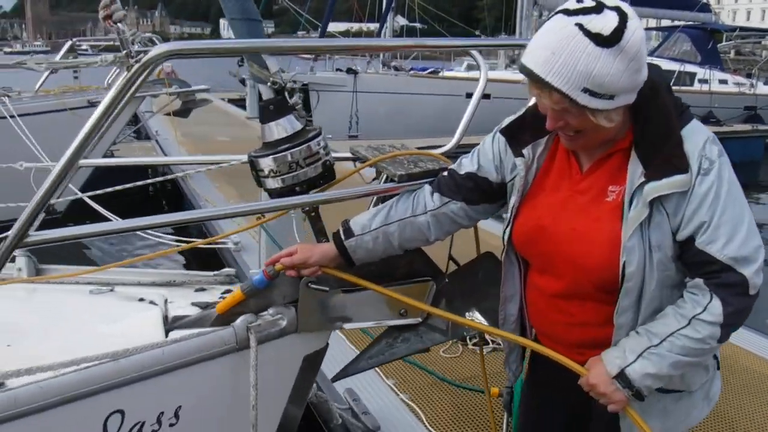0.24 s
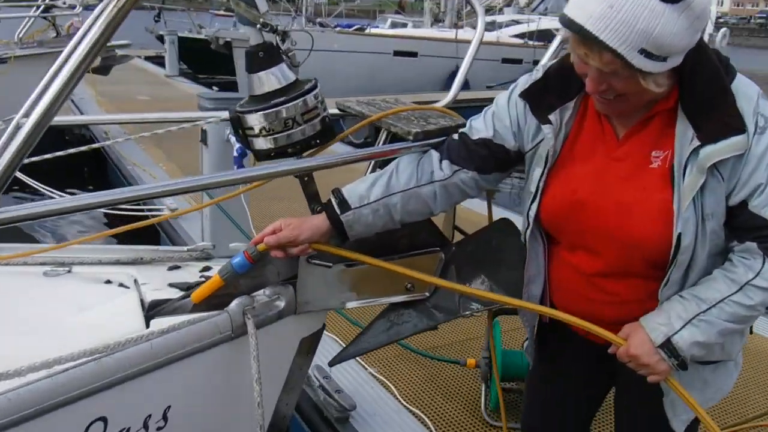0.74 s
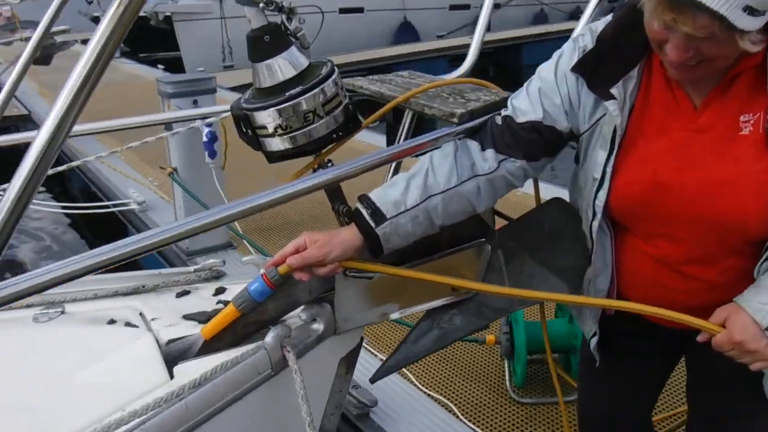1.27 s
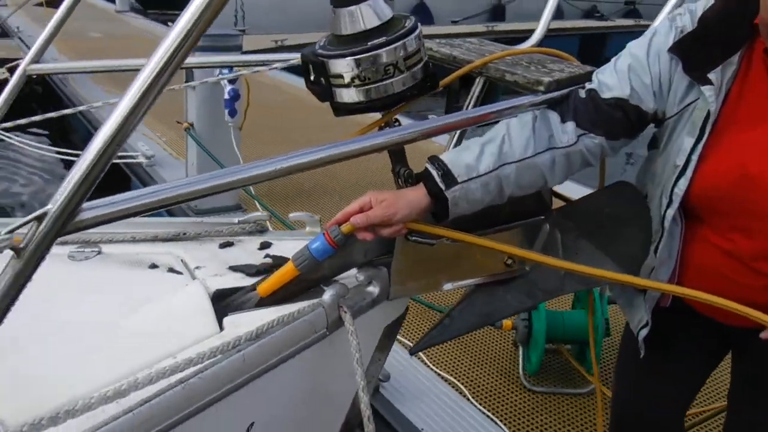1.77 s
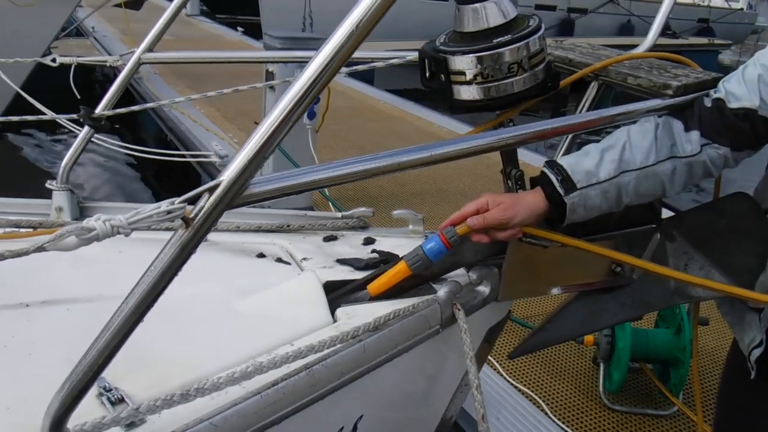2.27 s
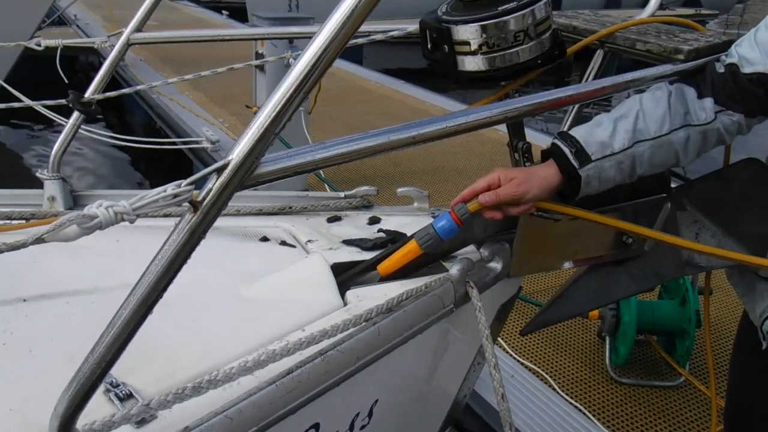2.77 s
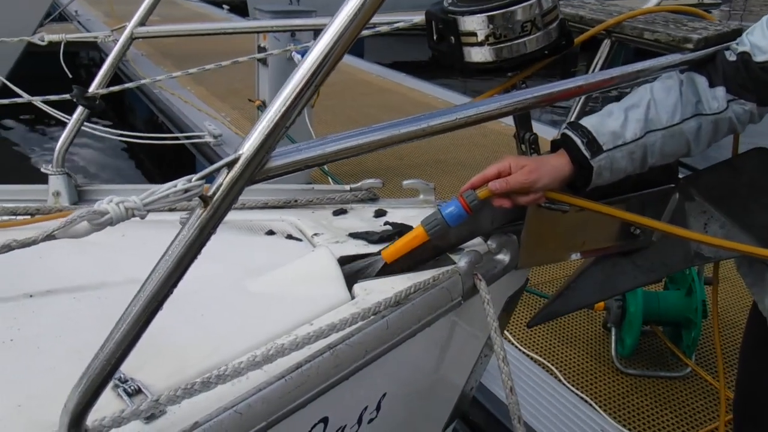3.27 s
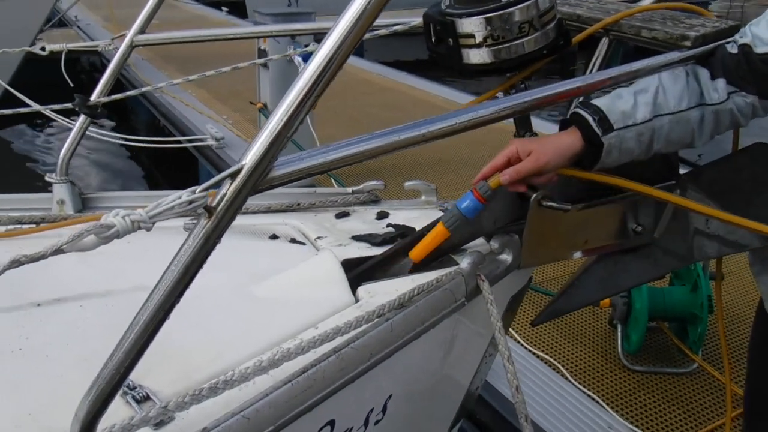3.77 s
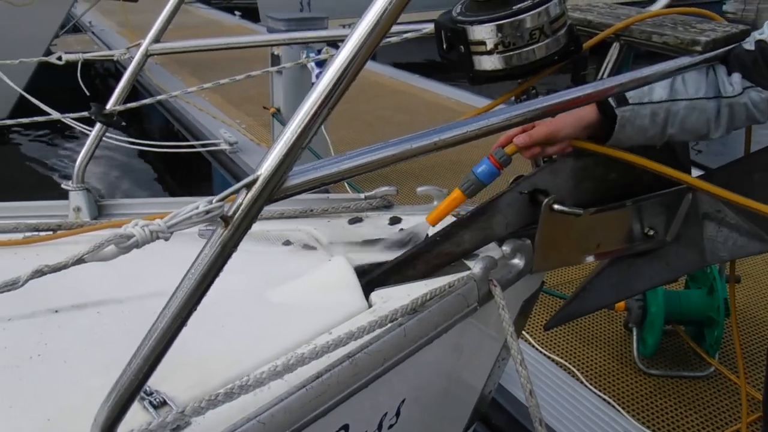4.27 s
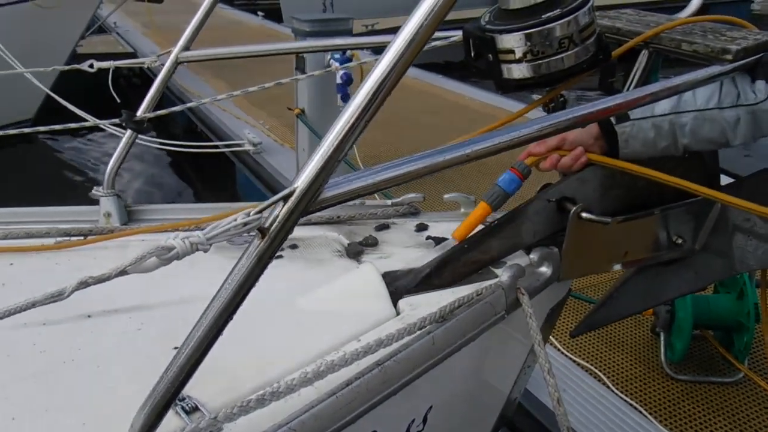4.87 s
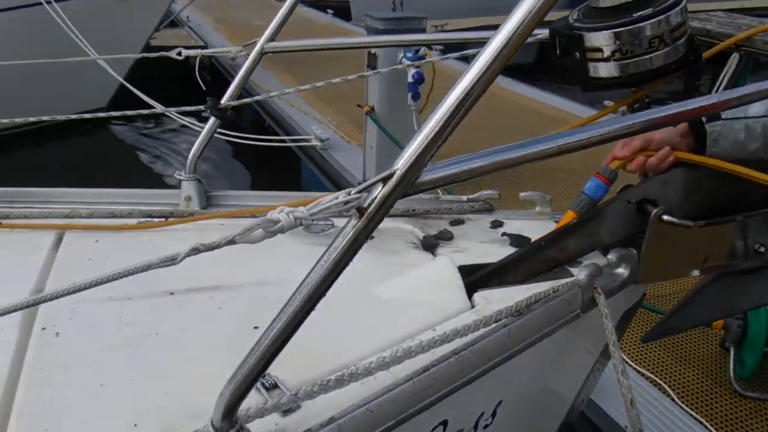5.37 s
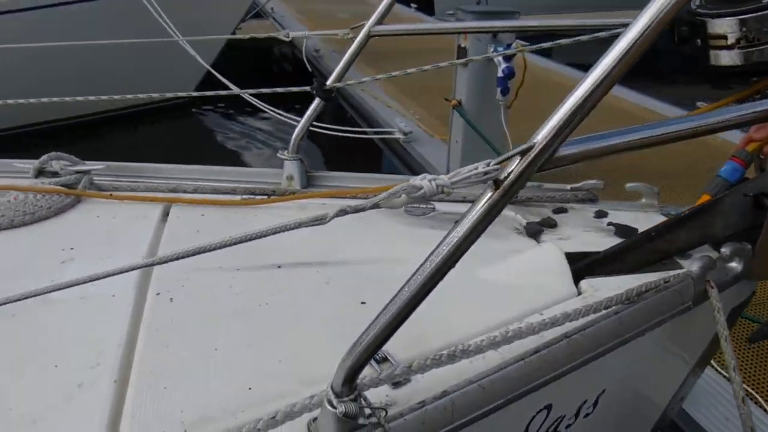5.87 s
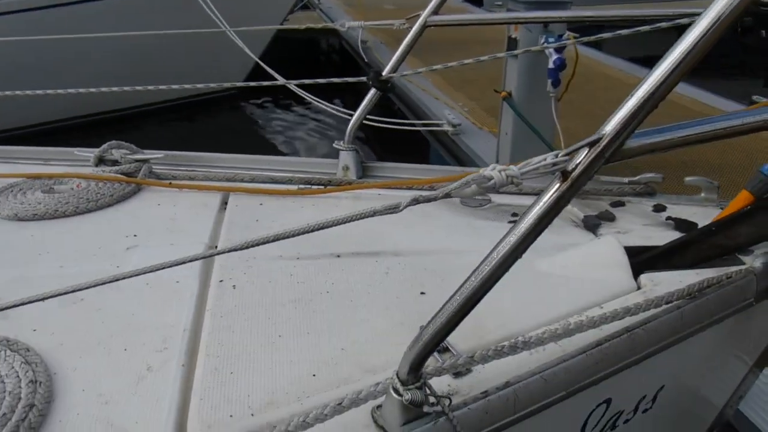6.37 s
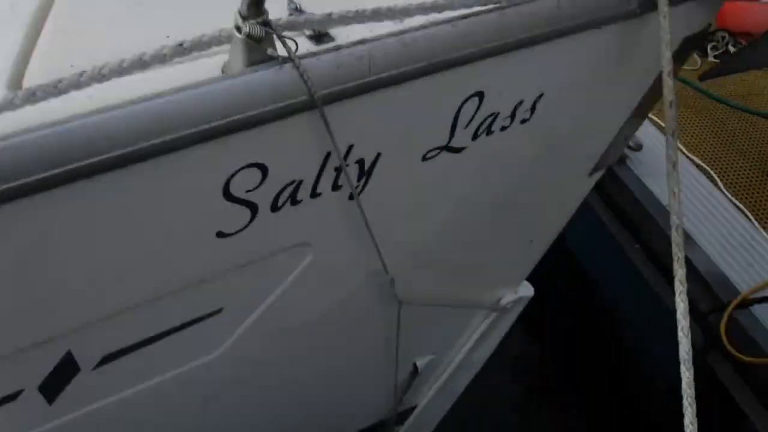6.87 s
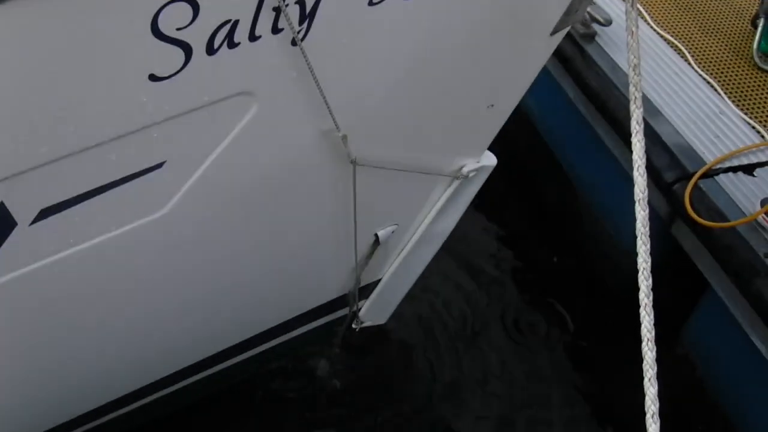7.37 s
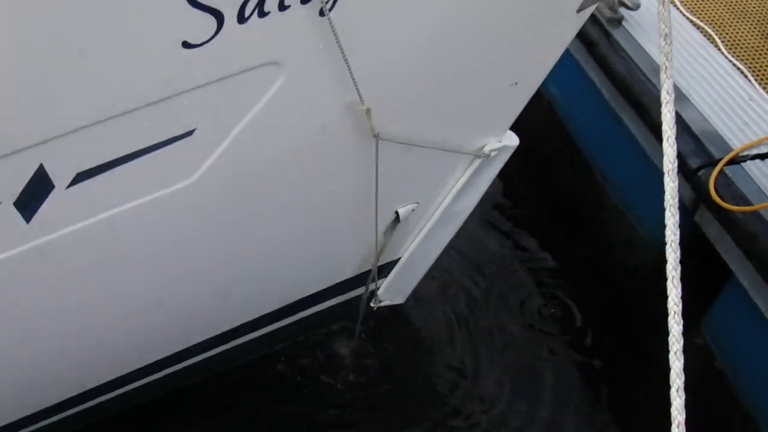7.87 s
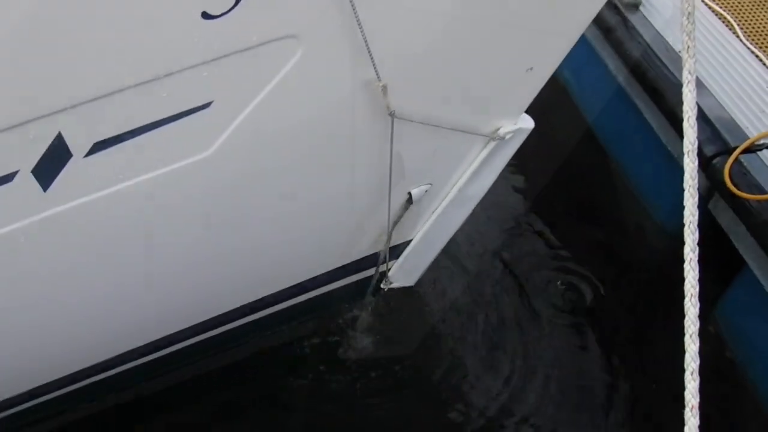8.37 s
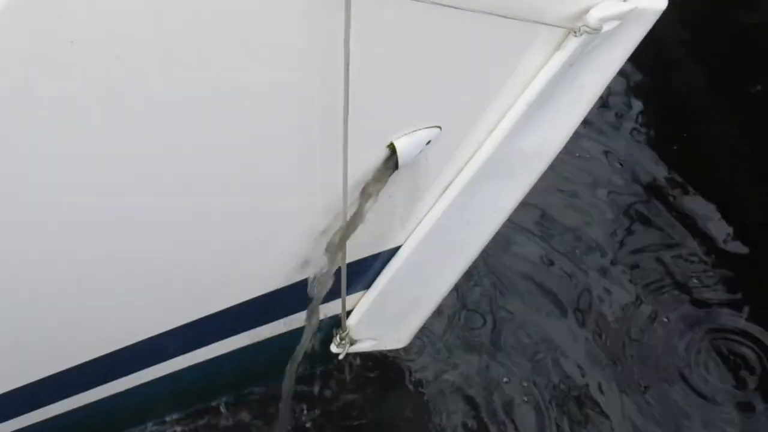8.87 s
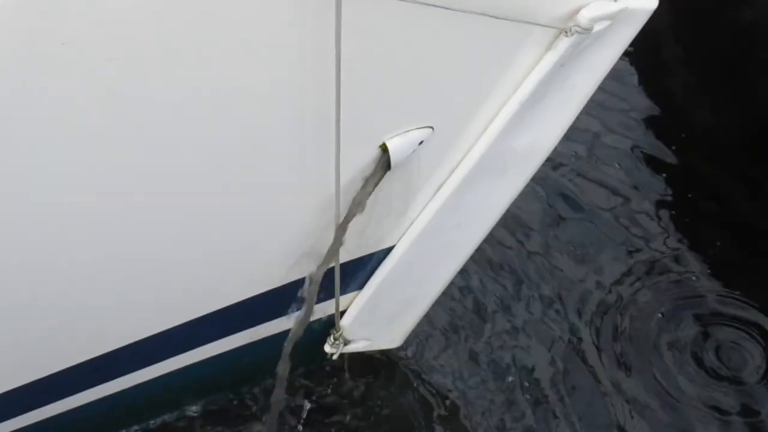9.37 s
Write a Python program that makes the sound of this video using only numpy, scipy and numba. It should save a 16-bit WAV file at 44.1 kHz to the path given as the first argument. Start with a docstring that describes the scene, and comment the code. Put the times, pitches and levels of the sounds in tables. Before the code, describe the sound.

A hand-held microphone hears a hose sprayed into a boat's bow locker. Thin, breathy hiss becomes louder, coarser spray with spatter, air bubbles and watery slaps on the hull. Two close knocks come early on. Later the view of sound moves to dripping outflow and plops, then jumps suddenly to a stronger stream, with faint wind and low drone underneath.

```python
"""A hose jet plays into the anchor locker of a moored yacht: spray is banded noise and droplet impacts,
with a wavering ring, tiny ringing bubbles and short echoes. Slugs and sheets of water are noise bursts
that crack and die away as spatter; air pockets in the locker are rising, dying sines over sloshing noise.
Bumps on the hand-held microphone are dull thuds; a low drone and light wind lie underneath."""
import sys
import numpy as np
from scipy import signal
from scipy.io import wavfile
from scipy.ndimage import map_coordinates
from numba import njit

SR = 44100
rng = np.random.default_rng(int(sys.argv[2]) if len(sys.argv) > 2 else 0)


def unload_audio(sound):
    """Save the sound as a 16-bit wav file, at the path given as the first command line argument."""
    columns = np.transpose(np.atleast_2d(sound))
    # keep every value between -1 and 1, then stretch to whole-number steps
    steps = np.round(np.clip(columns, -1, 1) * 32767)
    wavfile.write(sys.argv[1], SR, steps.astype(np.int16))


N = 424241

# Spray spectrum. Each row: frequency in Hz, relative density in dB per Hz.
HISS_SPECTRUM = [(2650, -0.5), (3500, 0), (4500, 2), (5600, -0.5), (7000, -4), (8000, -14.5), (9000, 1)]
# Splash body spectrum. Each row: frequency in Hz, relative density in dB per Hz.
BODY_SPECTRUM = [(850, -13), (1100, -9), (1400, -3), (1900, 0), (2650, 0.5)]
# Water in the locker. Each row: time in seconds, bubbles in dB, sloshing in dB, loose spatter in dB.
LOCKER_LEVELS = [(0, -93, -72, -82), (1.45, -101, -68, -94), (1.5, -69, -63, -45), (2.8, -72, -63.5, -49.5),
                 (4.5, -63, -70.5, -44.5), (6.6, -87, -64, -40), (7, -71.5, -61.5, -45),
                 (8.36, -72, -60.5, -44), (8.85, -65, -64, -57), (8.95, -83, -78, -51)]


def from_db(db):
    """Decibels to gain."""
    return 10 ** (np.asarray(db) / 20)


def rms_one(x):
    """Scale to rms 1."""
    return x / np.sqrt(np.mean(x ** 2) + 1e-20)


def in_time(rows):
    """Columns of a curve table, interpolated sample by sample."""
    s, *columns = np.transpose(rows)
    return [np.interp(np.arange(N) / SR, s, c) for c in columns]


def drift(corner_hz):
    """Slow random curve of spread 1: coarse noise through a double one-pole low-pass."""
    step = 40   # samples per coarse point
    r = np.exp(-2 * np.pi * corner_hz * step / SR)
    coarse = rng.standard_normal(N // step + 2002)
    slow = signal.lfilter([1], [1, -2 * r, r * r], coarse)[2000:]   # settled part
    return np.interp(np.arange(N) / step, np.arange(len(slow)), rms_one(slow))


def drops(per_s, spread_db):
    """Random impacts of uneven size and sign; rms 1."""
    size_db = spread_db * np.minimum(rng.exponential(1, N), 5)
    sizes = from_db(size_db) * rng.choice([-1, 1], N)
    return rms_one(sizes * (rng.random(N) < per_s / SR))


def band_pass(x, low_hz, high_hz):
    """Second-order Butterworth band."""
    return signal.sosfilt(signal.butter(2, [low_hz, high_hz], "band", fs=SR, output="sos"), x)


def coloured(source, spectrum, patchy_db, surge_db):
    """Quarter-octave bands of a source, each with its level and a flicker partly shared, partly its own; rms 1."""
    hz, level_db = np.transpose(spectrum)
    band_count = round(4 * np.log2(hz[-1] / hz[0]))
    edges = np.geomspace(hz[0], hz[-1], band_count + 1)
    out = 0
    for k, (low, high) in enumerate(zip(edges, edges[1:])):
        shifted = np.roll(source, 4999 * (k % 2))   # alternate bands displaced in time
        band = band_pass(shifted, low, high)
        band_db = np.interp(np.log(low * high) / 2, np.log(hz), level_db)
        flicker_db = surge_db + patchy_db * (drift(11.7) + 0.41 * drift(5.9))
        out = out + band * from_db(band_db + flicker_db)
    return rms_one(out)


@njit
def moving_ring(x, cos_w, r):
    """A two-pole resonance whose centre may move."""
    y = np.zeros_like(x)
    for i in range(2, len(x)):
        y[i] = x[i] - x[i - 2] + 2 * r * cos_w[i] * y[i - 1] - r * r * y[i - 2]
    return y


def add(out, s, sound):
    """Mix a short sound in at time s."""
    at = round(s * SR)
    out[at:at + len(sound)] += sound[:N - at]


def reflected(x, lag_ms, share):
    """A short echo combs the spectrum; gain is scaled for equal power."""
    echo = map_coordinates(x, [np.arange(N) - lag_ms * SR / 1000], order=3)
    return (x + share * echo) / np.sqrt(1 + share ** 2)


def harbour():
    """Gusty wind as flickering low noise, and a low drone as a sine wavering in pitch and level."""
    # Gusts on the microphone. Each row: time in seconds, peak in dB.
    gusts = [(0.02, -74), (2.55, -65.5), (3.5, -72), (4.0, -71), (4.6, -71.5), (6.6, -84), (7.5, -73),
             (8.5, -69)]
    # Wind spectrum. Each row: frequency in Hz, relative density in dB per Hz.
    wind_spectrum = [(25, -14), (60, -6), (150, -8), (260, -16)]
    calm_db, gust_slope_db_per_s = -79.5, 39
    drone_hz, waver_hz, drone_db = 56.5, 2.2, -78.5
    drone_from_s, drone_to_s, drone_fade_db_per_s = 5.7, 8.7, 23
    t = np.arange(N) / SR
    slopes_db = [db - gust_slope_db_per_s * np.abs(t - s) for s, db in gusts]
    wind_db = np.max(slopes_db, axis=0).clip(calm_db) - 8 * (t > 8.9)   # it drops at last
    wind = coloured(rng.standard_normal(N), wind_spectrum, 1.1, 0.73 * drift(19))
    outside_s = np.maximum(drone_from_s - t, t - drone_to_s).clip(0)
    level_db = drone_db - drone_fade_db_per_s * outside_s
    phase = 2 * np.pi * np.cumsum(drone_hz + waver_hz * drift(8.3)) / SR
    drone = np.sin(phase) * from_db(1.8 * drift(3.2))
    return from_db(wind_db) * wind + from_db(level_db) * rms_one(drone)


def bubble(hz, t60_s, rise):
    """An air pocket rings as a dying sine that climbs in pitch as it nears the surface."""
    t = np.arange(round(t60_s * SR)) / SR
    tone = np.sin(2 * np.pi * hz * t * (1 + rise * t / t60_s))
    return tone * from_db(-60 * t / t60_s) * np.minimum(hz * t * 1.3, 1)


def bumps():
    """Fingers shift on the microphone housing: short dull thuds, each a rising, dying sine."""
    # Bumps. Each row: start in seconds, level in dB, starting pitch in Hz.
    bump_rows = [(0.002, -41, 170), (0.028, -45, 193), (.702, -52, 80), (0.76, -47.5, 170),
                 (.895, -51, 70.4), (1.076, -47, 121), (2.83, -54, 403), (1.515, -49, 148),
                 (1.565, -49, 90), (2.44, -44, 149), (2.474, -30, 296), (2.479, -46, 90), (2.509, -44, 150),
                 (2.605, -44, 200), (2.629, -46, 180), (2.657, -42, 201), (3.858, -56, 143),
                 (4.39, -48, 100), (6.72, -46, 90.5)]
    out = np.zeros(N)
    for s, level_db, hz in bump_rows:
        add(out, s, from_db(level_db) * bubble(hz, 4.5 / hz, rise=0.78))
    return out


def locker(surge_db):
    """Sloshing noise, random small bubbles and the loudest plops of trapped air."""
    # Large air pockets. Each row: start in seconds, level in dB, starting pitch in Hz.
    plop_rows = [(1.488, -45.5, 656), (1.566, -40.5, 565), (1.567, -38, 820), (2.119, -47.5, 496),
                 (3.303, -44, 467), (3.46, -45, 746), (4.02, -48.5, 393), (4.361, -54, 398),
                 (4.755, -46, 404), (5.202, -43.5, 770), (5.242, -44.5, 700), (5.289, -47, 535),
                 (5.944, -46, 674), (6.766, -41, 789), (7.217, -47.5, 520), (7.462, -41, 725),
                 (7.463, -49, 330), (7.63, -46, 594), (7.776, -40, 830), (7.805, -41.5, 590),
                 (8.08, -56, 280), (8.672, -42.5, 690), (8.674, -49, 295), (9.151, -54, 266),
                 (9.557, -53, 270)]
    # Sloshing spectrum. Each row: frequency in Hz, relative density in dB per Hz.
    wash_spectrum = [(270, -23), (400, -1.5), (950, 5)]
    lowest_hz, sag_hz_per_s = 0.882 * 561.4, 0.882 * 30   # pockets sound lower as the locker fills
    bubbles_db, wash_db = in_time(LOCKER_LEVELS)[:2]
    small, plops = np.zeros(N), np.zeros(N)
    for when, pitch, size in rng.random((700, 3)):
        s = when * N / SR
        hz = (lowest_hz - sag_hz_per_s * s) * 4.0 ** pitch ** 2.1   # up to two octaves above, mostly low
        add(small, s, from_db(-3.0 * np.log(size + 0.041)) * bubble(hz, 30 / hz, 0.21))
    for s, level_db, hz in plop_rows:
        add(plops, s, from_db(level_db) * bubble(hz, 22 / hz, 0.032))
    wash = coloured(rng.standard_normal(N), wash_spectrum, 4.3, 0.5 * surge_db)
    return from_db(bubbles_db) * rms_one(small) + from_db(wash_db) * wash + plops


def splats(rows, width, tail_s):
    """Water cracks on the hull and breaks up into a lumpy, dying spatter: band-passed noise bursts."""
    out, t = np.zeros(N), np.arange(1300) / SR
    noises = rng.standard_normal((len(rows), len(t)))
    for (s, peak_db, hz), noise in zip(rows, noises):
        lumps = from_db(3.5 * np.repeat(noise[:26], 50))   # the slug lands in several pieces
        decay = np.exp(-t / 0.0005) + 0.12 * lumps * np.exp(-t / tail_s)
        burst = noise * decay + 2 * (t == 0)
        sound = band_pass(burst, hz / width, hz * width)
        add(out, s, from_db(peak_db) * sound / np.abs(sound).max())
    return out


def spatter():
    """Loose drops patter on the hull at random: small splats of uneven size."""
    ticks = []
    for when, pitch, size in rng.random((1300, 3)):
        ticks.append((when * N / SR, -4.0 * np.log(size + 0.04), 3800 * 1.7 ** pitch))
    return from_db(in_time(LOCKER_LEVELS)[2]) * rms_one(splats(ticks, 1.12, 0.0062))


def fizz(surge_db):
    """Tiny bubbles trapped by the jet ring briefly, each at one of 30 pitches; rms 1 before the surge."""
    per_s, cycles_to_60_db, lean_db_per_octave = 700, 14.7, 13.0
    born, dealt = drops(per_s, 3.5), rng.integers(0, 30, N)
    hz, level_db = np.transpose(BODY_SPECTRUM[:-1] + HISS_SPECTRUM[1:-1])
    out = 0
    for k, pitch in enumerate(np.geomspace(1000, 8000, 30)):
        r, w = from_db(-60 * pitch / (cycles_to_60_db * SR)), 2 * np.pi * pitch / SR
        ring = signal.lfilter([1 - r], [1, -r], born * (dealt == k) + 1e-18)   # soft start
        ring = signal.lfilter([1, -1], [1, -2 * r * np.cos(w), r * r], ring)
        pitch_db = np.interp(pitch, hz, level_db) + lean_db_per_octave * np.log2(pitch / 4000)
        out = out + rms_one(ring) * from_db(pitch_db + 1.9 * drift(1.3))
    return rms_one(out) * from_db(surge_db)


def hull(splash):
    """The hull hums under the splash: one panel resonance added."""
    hum_hz, width_hz, hum_db = 1167, 184, -18.5
    cos_w = np.full(N, np.cos(2 * np.pi * hum_hz / SR))
    hum = moving_ring(splash, cos_w, np.exp(-np.pi * width_hz / SR))
    return splash + from_db(hum_db) * rms_one(hum)


def spray(slugs, surge_db):
    """Dense droplets on smooth jet noise; a hollow under the jet rings, the deck throws an echo."""
    # Spray level rises and falls, with an abrupt step at 8.365 s. Each row: time in seconds, spray in dB.
    spray_levels = [(0, -46.5), (.24, -46), (.38, -44.5), (.46, -50.5), (.51, -41.5), (.6, -42.5),
                    (.68, -41), (1.4, -47.5), (1.52, -42), (1.7, -37.5), (2.11, -41.5), (2.19, -38.5),
                    (2.75, -35.5), (3.22, -40), (3.4, -45.5), (3.47, -37.5), (3.68, -31), (4.01, -33.5),
                    (4.16, -35.5), (4.21, -34), (4.235, -38.5), (4.285, -32), (4.93, -37), (5.54, -34.5),
                    (5.76, -37), (5.88, -31.5), (5.98, -32.5), (6.05, -36.5), (6.68, -35.5), (7.09, -42.5),
                    (7.45, -44), (7.75, -41), (8.364, -42.5), (8.369, -33), (8.55, -34), (8.82, -33.5),
                    (9.14, -36.5), (9.2, -39), (9.38, -40), (9.55, -32.5), (9.62, -34)]
    # Ring of the struck hollow. Each row: time in seconds, pitch in Hz, level against the hiss in dB.
    aim = [(0.0, 7100, 7), (0.16, 4400, -20), (0.5, 7140, -5), (0.88, 4280, -12), (1.5, 4150, 0),
           (2.11, 5270, -3), (2.82, 5330, -2.5), (3.1, 4300, -2), (3.95, 5560, -15), (4.05, 4850, 3.5),
           (4.4, 3650, -5), (4.94, 3600, -4), (5.31, 5030, -7), (5.88, 5430, 1.5), (6.87, 5870, -4.5),
           (8.36, 5170, -24), (8.37, 5860, -6), (9.19, 5900, 1.5), (9.62, 6340, 8)]
    # Splash body and fine mist vary, with an abrupt step at 8.365 s. Each row: time in seconds,
    # body in dB and mist in dB, both at mean spray, extra top treble of the mist in dB.
    body_and_mist = [(0, -50, -57, 0), (.45, -50.5, -56, -9), (.55, -48, -55.5, 0), (1.4, -51, -64.5, 4.5),
                     (1.7, -50, -62, 2), (3.3, -50.5, -71.5, 11), (3.65, -49.5, -57, 2),
                     (4.0, -48.5, -57, 1), (4.17, -54.5, -68, 8), (4.3, -46.5, -59, 9),
                     (4.45, -49.5, -69, 13), (4.9, -48, -76, 20), (5.4, -47.5, -67, 10),
                     (6.5, -47, -74, 15), (6.9, -46.5, -57, 2), (8.362, -46, -59.5, -15),
                     (8.37, -48, -53.5, 2), (9.1, -50, -50.5, -3), (9.62, -52, -48, -5)]
    # Reflection off the deck. Each row: time in seconds, lag in ms, share in the hiss, share in the mist.
    deck_echo = [(0, .5, .22, 0), (.8, .49, .25, 0), (1.3, .4, .08, .2), (2.2, .367, .15, .4),
                 (4.4, .36, .16, .43), (5.8, .338, .11, .3), (6.6, .33, 0, 0)]
    # Hollow band between splash and hiss. Each row: time in seconds, centre in Hz, depth 0-1.
    hollow = [(0, 2400, 0.65), (1.3, 2270, 0.75), (1.6, 2510, 0.82), (4.9, 2670, 0.66), (5.8, 2660, 0.34),
              (8.362, 2400, 0.77), (8.37, 3840, 0.28), (9.1, 3900, 0.5), (9.3, 3350, 0.35), (9.62, 3100, 0)]
    # Fine mist spectrum. Each row: frequency in Hz, relative density in dB per Hz.
    mist_spectrum = [(8800, 10.5), (10500, 0.5), (12500, -4), (16500, -6)]
    body_follows, mist_follows = 0.55, 0.37   # share of the spray's swing in dB
    ring_width_hz, hollow_width_hz, top_hz, fizz_db = 1300, 800, 10400, -15   # fizz against spray
    rail_lag_ms, rail_share, rail_gone_s = 0.84, 0.26, 5.6   # a second, farther echo

    spray_db, = in_time(spray_levels)
    ring_hz, ring_db = in_time(aim)
    body_db, mist_db, top_db = in_time(body_and_mist)
    lag_ms, hiss_share, mist_share = in_time(deck_echo)
    hollow_hz, depth = in_time(hollow)
    swing_db = spray_db - spray_db.mean()

    hiss_water, body_water, mist_water, ring_water = rng.standard_normal((4, N))
    hits = drops(1200, 2.5)   # the same droplets are heard in hiss and mist
    hiss_water += from_db(-7.5) * hits
    body_water += from_db(-14.0) * drops(500, 1.0)
    mist_water += from_db(-6.0) * hits

    ring_cos = np.cos(2 * np.pi * ring_hz * (1 + 0.039 * drift(5.1)) / SR)   # wavers with the water in it
    ring_r = np.exp(-np.pi * ring_width_hz / SR)
    ring = moving_ring(moving_ring(ring_water, ring_cos, ring_r), ring_cos, ring_r)
    hiss = coloured(hiss_water, HISS_SPECTRUM, 1.5, surge_db) + from_db(ring_db + surge_db) * rms_one(ring)
    hiss = from_db(spray_db) * hiss / np.sqrt(1 + from_db(2 * ring_db)) + slugs
    hiss = signal.sosfilt(signal.butter(6, 8800, fs=SR, output="sos"), hiss)
    bubbles = from_db(spray_db + fizz_db) * fizz(surge_db)

    body = hull(coloured(body_water, BODY_SPECTRUM, 1.8, 1.95 * surge_db))
    body = from_db(body_db + body_follows * swing_db) * body

    mist = coloured(mist_water, mist_spectrum, 0.69, 1.2 * surge_db)
    mist = from_db(mist_db + mist_follows * swing_db) * mist
    top = signal.sosfilt(signal.butter(2, top_hz, "high", fs=SR, output="sos"), mist)
    mist = mist + (from_db(top_db) - 1) * top

    rail = rail_share * np.clip(rail_gone_s - np.arange(N) / SR, 0, 1)   # fades over the last second
    low = reflected(reflected(hiss, lag_ms, hiss_share) + bubbles, rail_lag_ms, rail) + body
    r = np.exp(-np.pi * hollow_width_hz / SR)
    hollow_band = (1 - r * r) / 2 * moving_ring(low, np.cos(2 * np.pi * hollow_hz / SR), r)
    return low - depth * hollow_band + reflected(mist, lag_ms, mist_share)


def scene():
    """All sources, heard by one microphone; the same signal in both channels."""
    # Slugs of water. Each row: start in seconds, peak in dB ahead of the spray's filters, centre in Hz.
    slug_rows = [(1.4877, -22, 5360), (2.0444, -19, 5700), (2.088, -36, 6200), (2.1751, -21, 5760),
                 (2.5019, -16, 5800), (3.2166, -25.5, 5800), (3.305, -21, 6200), (3.4617, -19, 4930),
                 (3.618, -17, 5960), (3.9072, -13, 5530), (4.0813, -19, 4540), (4.2554, -21, 5400),
                 (4.3106, -13, 4500), (4.331, -14, 4600), (4.4634, -16, 5540), (4.9613, -15, 5330),
                 (6.1102, -24, 5750), (6.2365, -19, 5840), (6.274, -47, 6300), (6.8974, -57, 5160),
                 (7.0111, -31, 4710), (7.0301, -18, 5550), (7.048, -21, 5740), (7.0565, -44, 4570),
                 (7.1413, -22.5, 5370), (7.1733, -17, 5000), (7.1857, -31, 5500), (7.1907, -37, 4650),
                 (7.283, -24, 5040), (7.2965, -23, 5130), (7.3244, -24, 5100), (7.3399, -19, 4500),
                 (7.4062, -18, 5350), (7.4646, -26, 5040), (7.5539, -25, 5530), (7.5669, -17.5, 4780),
                 (7.6332, -18, 5050), (7.6756, -22, 5040), (7.71, -20, 5600), (7.727, -25, 5170),
                 (7.7634, -20, 5700), (7.8587, -14, 3700), (7.8715, -18, 4800), (7.937, -21, 4600),
                 (7.9894, -26, 4460), (8.0218, -19, 4670), (8.0607, -20, 4600), (8.0827, -30, 4440),
                 (8.1886, -26, 5260), (8.2169, -27, 5530), (8.2658, -20, 5200), (8.2987, -20, 5370),
                 (8.6733, -20, 4900), (8.81, -18, 4600), (8.822, -16.5, 4280), (9.3887, -19.5, 4600)]
    # Fuller sheets slapping the hull. Each row: start in seconds, peak in dB, centre in Hz.
    slap_rows = [(3.304, -35, 1920), (3.5496, -23.5, 2110), (3.96, -32, 1710), (4.135, -33, 2280),
                 (5.0292, -24.5, 1780), (5.0835, -29, 2270), (5.2115, -26.5, 2110), (5.518, -25.5, 2050),
                 (5.933, -27, 2090), (7.288, -29.5, 1890), (7.8486, -35, 1230), (8.1805, -33, 1680),
                 (9.4206, -34, 1210)]
    surge_db = 0.07 * drift(7.9) + 0.83 * drift(77)   # the jet breaks up unevenly
    slugs = splats(slug_rows, 1.26, 0.007) + spatter()
    water = spray(slugs, surge_db) + splats(slap_rows, 1.19, 0.009) + locker(surge_db)
    return np.tile(water + bumps() + harbour(), (2, 1))


def record(dry):
    """A steep elliptic low-pass cuts the top."""
    cutoff_hz = 15750
    return signal.sosfilt(signal.ellip(12, 0.5, 60, cutoff_hz, fs=SR, output="sos"), dry)


dry = scene()
out = record(dry)
unload_audio(out)
```